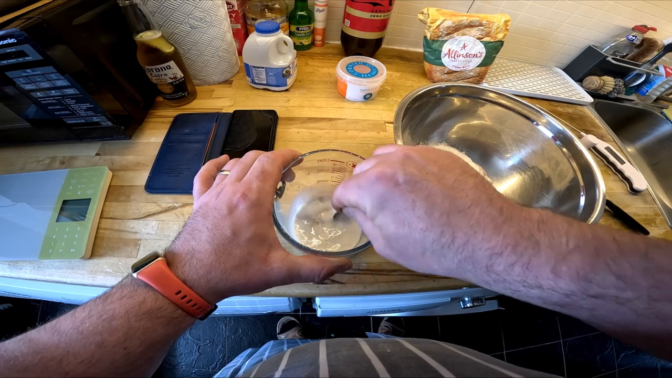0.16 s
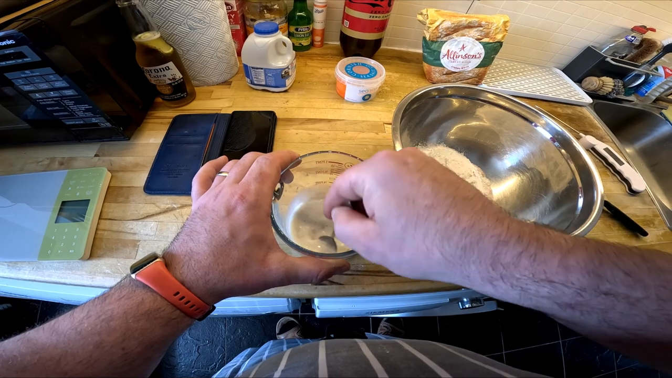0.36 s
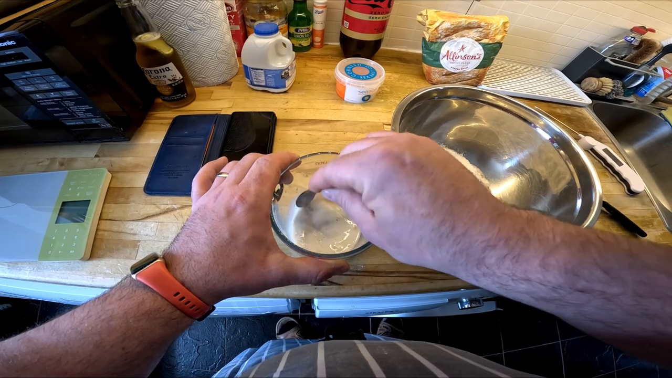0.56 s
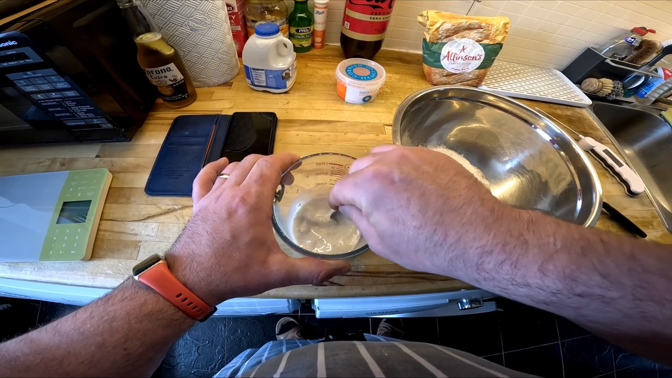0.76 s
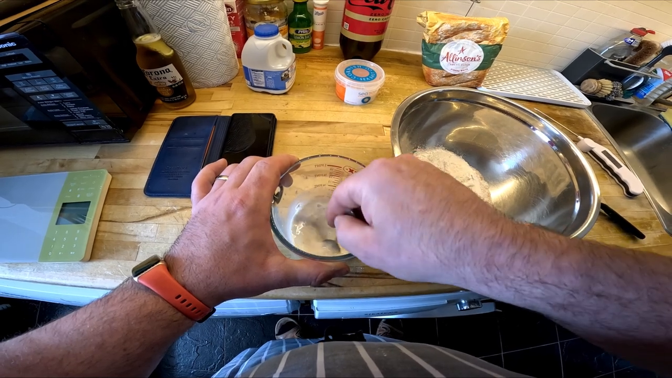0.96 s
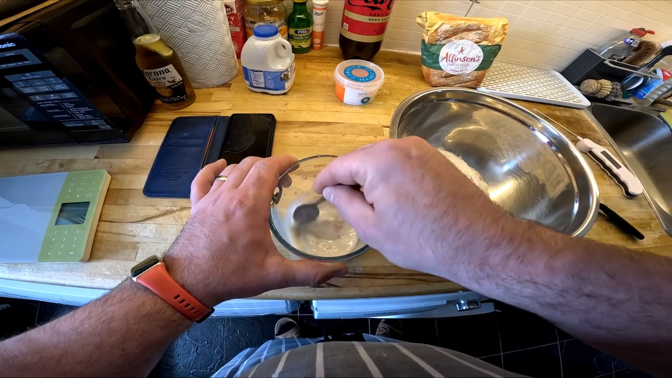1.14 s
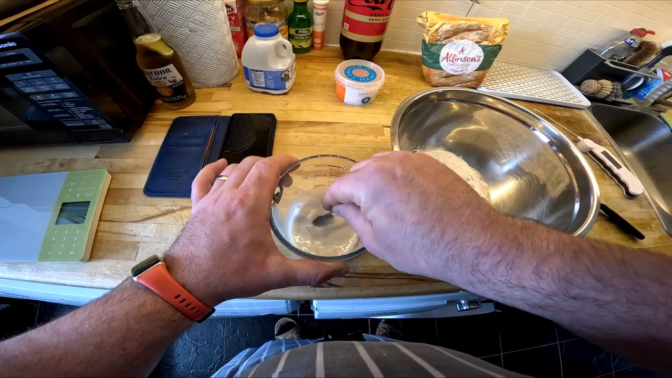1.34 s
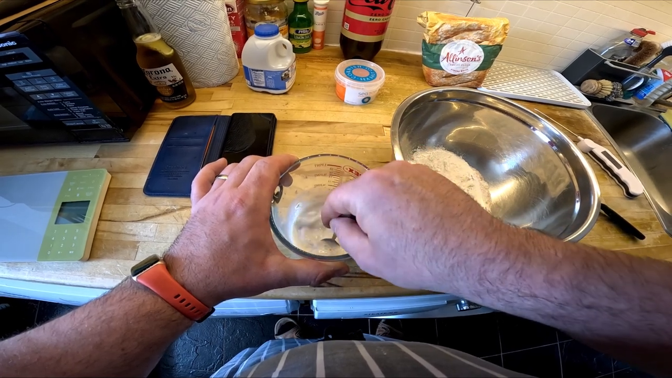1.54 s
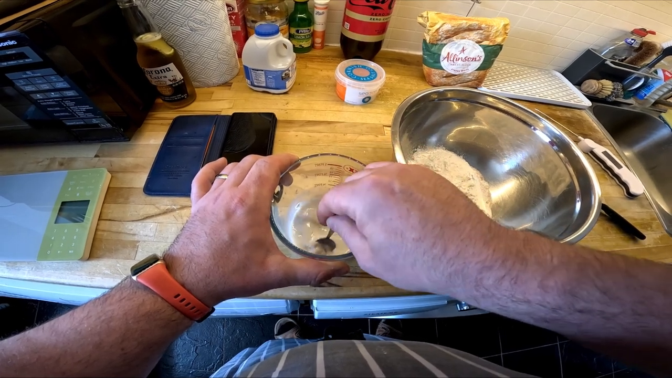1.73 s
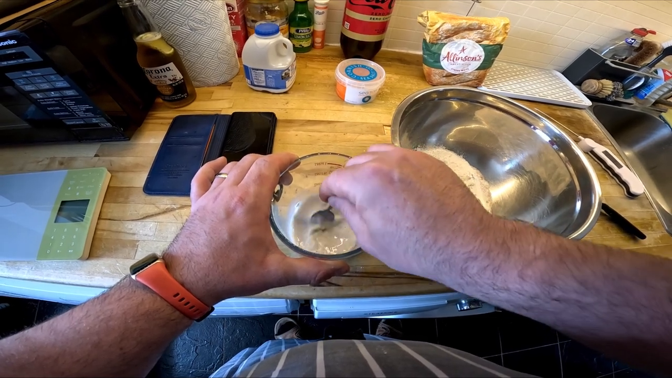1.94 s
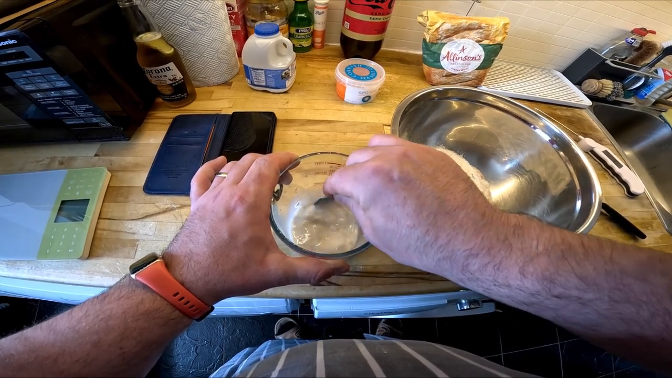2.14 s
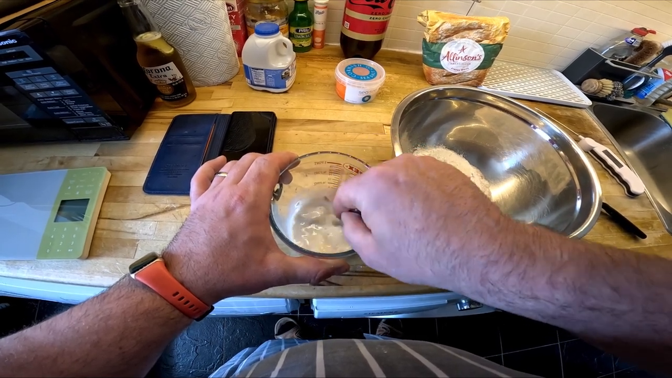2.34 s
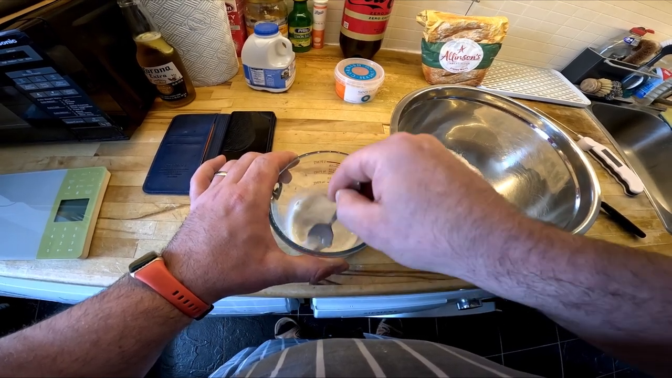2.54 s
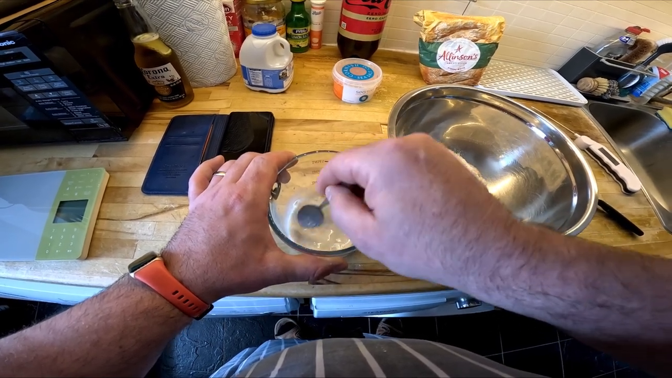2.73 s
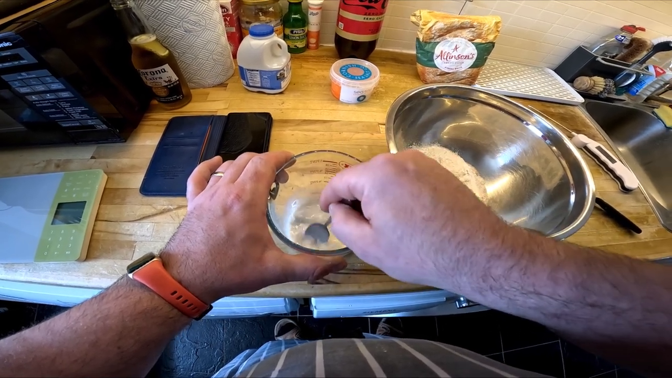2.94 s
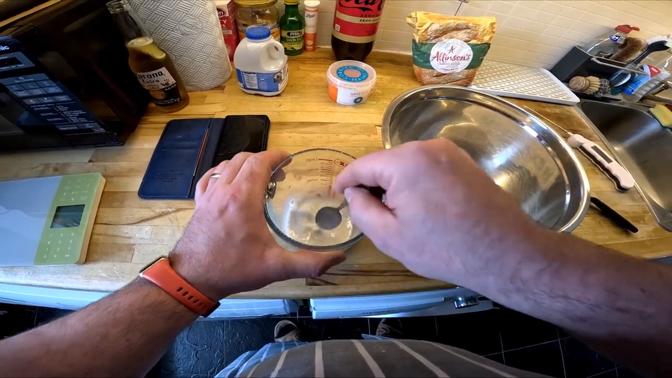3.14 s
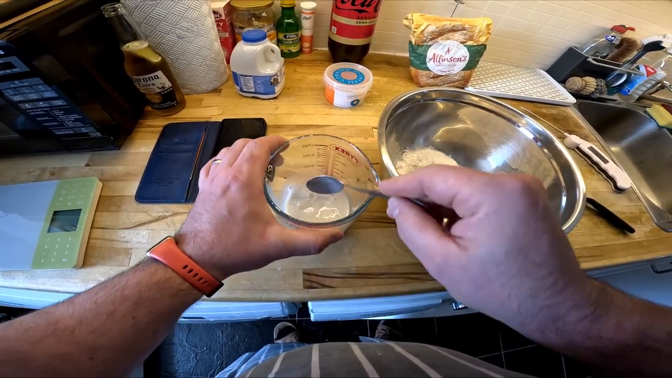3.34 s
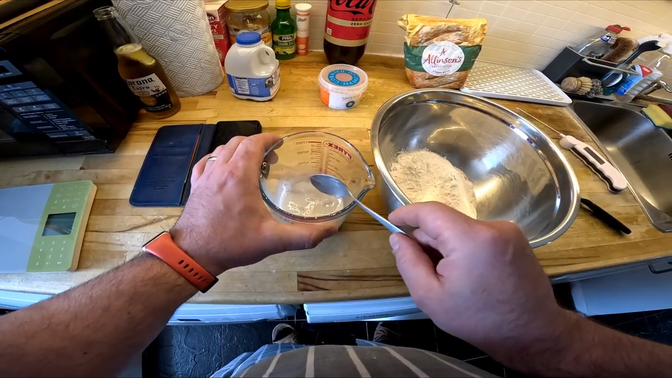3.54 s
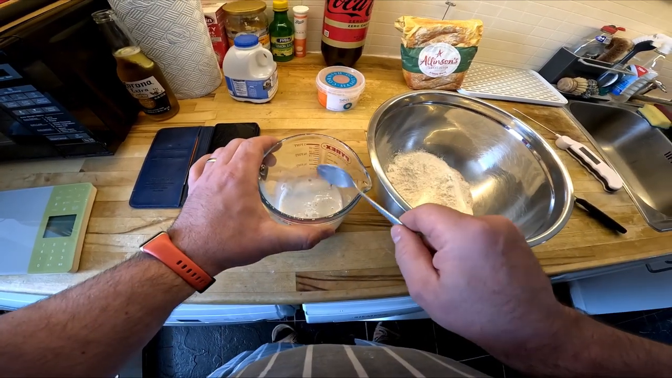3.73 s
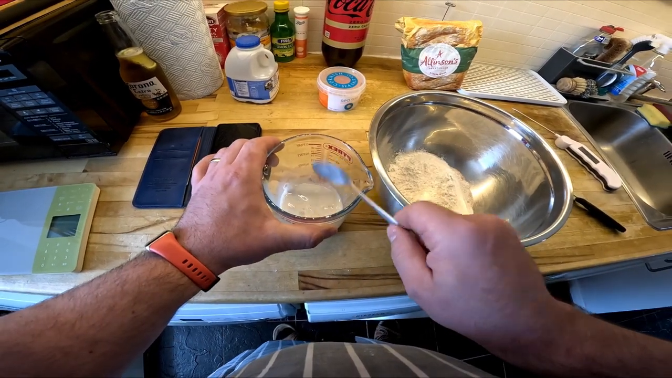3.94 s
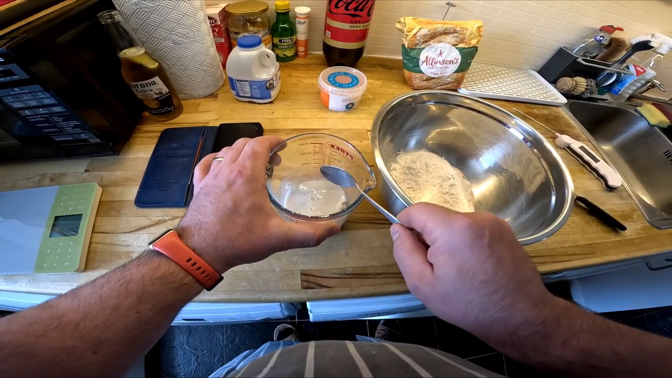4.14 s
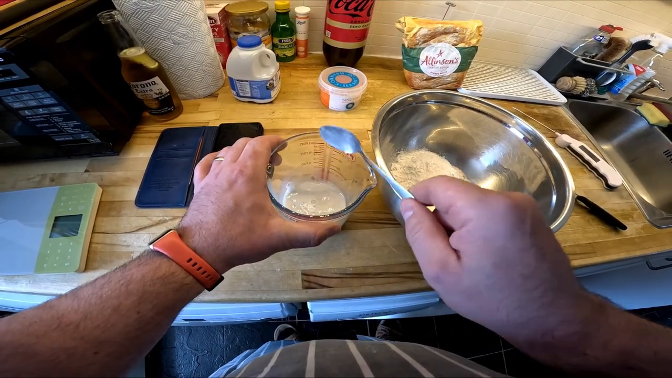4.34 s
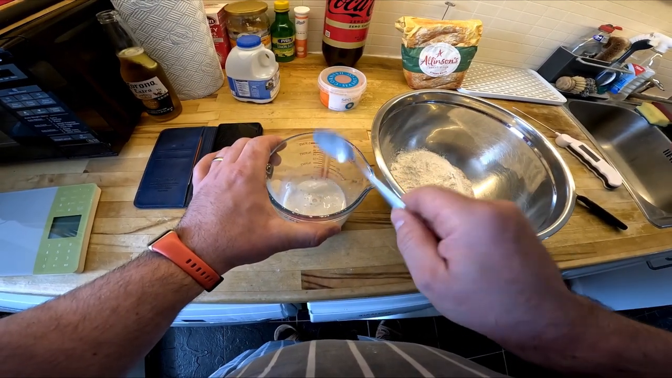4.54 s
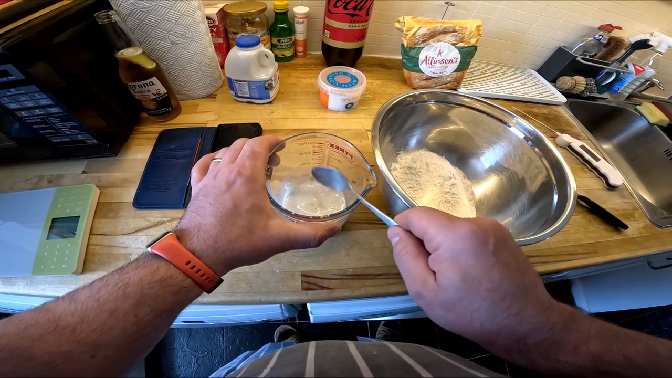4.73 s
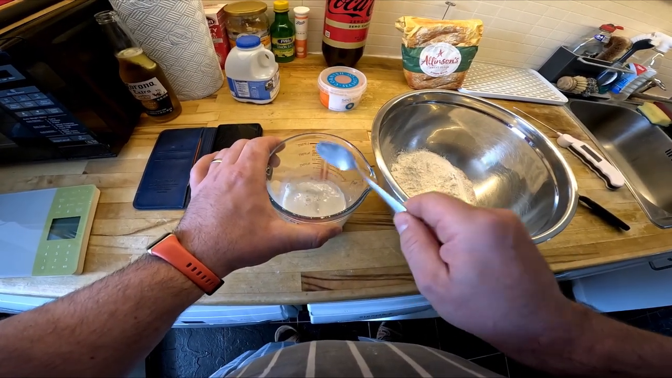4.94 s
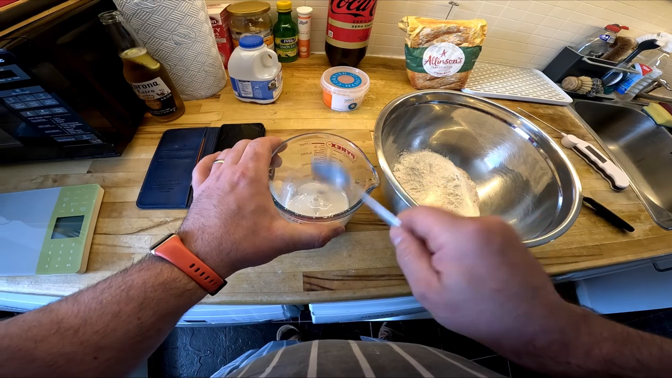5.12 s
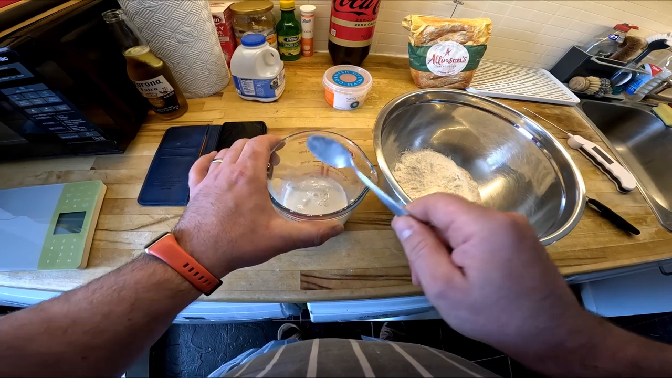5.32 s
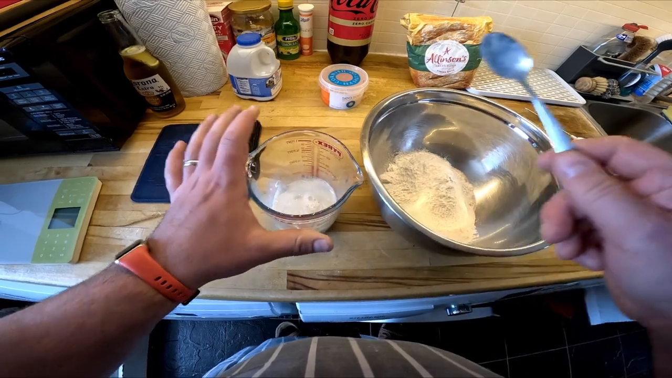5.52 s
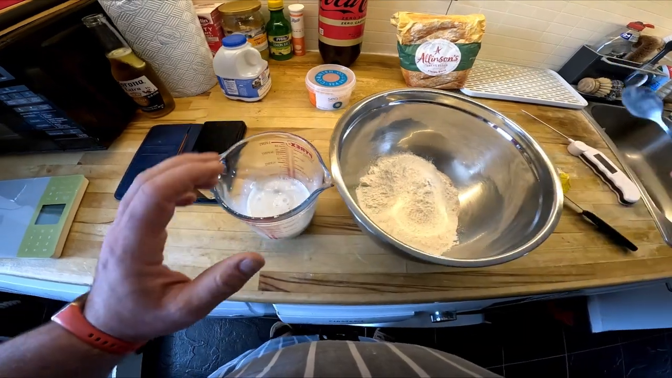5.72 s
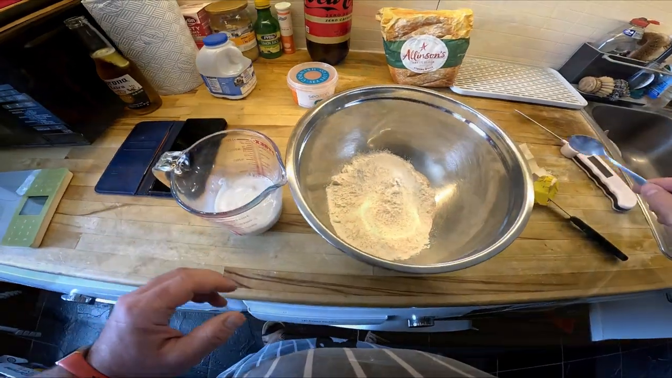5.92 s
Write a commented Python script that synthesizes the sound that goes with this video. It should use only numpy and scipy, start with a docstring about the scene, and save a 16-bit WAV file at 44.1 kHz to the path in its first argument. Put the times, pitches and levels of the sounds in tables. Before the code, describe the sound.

Close, arm's-length stereo pickup in a small domestic kitchen. A spoon knocks unevenly against the inside of a glass jug while stirring, some clinks dull and faint, others sharper, with tiny grazes and a low rumble swelling with each stroke. After a short pause come six crisp spoon taps on the glass rim, the last bouncing once, with woody thuds beneath. Then only quiet room air and a faint appliance hum remain.

```python
"""A low rumble of room air and a faint hum run throughout, as filtered noise and wavering sine tones.
First a metal spoon stirs a little liquid in a hand-held glass jug: strokes swell a low shudder and rumble,
while clinks and grazes ring damped glass modes. The spoon is lifted out and the jug shifts on the worktop.
Then six clean taps on the rim, the last with a rebound, ring spoon and glass and thump the wooden worktop.
A small kitchen answers each blow with a bounce and a diffuse tail, heard from an arm's length."""
import sys
import numpy as np
from scipy import signal
from scipy.fft import rfft, irfft
from scipy.io import wavfile

SR = 44100
rng = np.random.default_rng(int(sys.argv[2]) if len(sys.argv) > 2 else 0)


def wav_record(signal):
    """Record a signal, one row per channel, as 16-bit PCM in the file named by sys.argv[1]."""
    frames = np.transpose(np.atleast_2d(signal))
    bounded = np.clip(frames, -1, 1)
    # unit amplitude maps onto the largest positive 16-bit level
    quanta = np.round(bounded * 32767).astype(np.int16)
    wavfile.write(sys.argv[1], SR, quanta)


N = 267687
TIME = np.arange(N) / SR
RING_TIME = TIME[:SR // 2]
LEFT_RIGHT = np.array([[1], [-1]])  # side signal: opposite sign in the two channels

# colour of the room air: f/Hz, relative level/dB
AIR_SPECTRUM = [(25, -0.5), (45, -3.5), (65, -15), (160, -14), (300, -23.5), (700, -33), (1300, -30.5),
                (2500, -42.5), (4500, -47), (7000, -44.5), (10000, -55.5), (13000, -59), (16000, -81.5)]
# hum of an appliance, mean strength: f/Hz, level/dB
HUM_TONES = [(149, -66.5), (199, -72.5)]
# kitchen reverberation before the wet level: f/Hz, relative level/dB, t60/s
ROOM_BANDS = [(80, -9, 0.39), (322, 13, 0.28), (890, 5.5, 0.28), (2840, -1, 0.38), (6840, -10, 0.39),
              (9900, -2, 0.4), (15100, -9.5, 0.41)]
# colour of the stirring rumble: f/Hz, relative level/dB
STIR_COLOUR = [(20, -9), (45, 1), (70, -11.5), (100, -16), (200, -33.5), (500, -36.5), (1500, -49.5),
               (6000, -61), (15000, -89)]
# worktop under the jug, before small random shifts: f/Hz, relative level/dB, t60/s
BOARD_MODES = [(49, -7, 0.083), (76, -12, 0.219), (96, -2, 0.16), (153, 0, 0.09), (184, -2, 0.18),
               (215, -3, 0.045), (255, -6, 0.081), (334, -9, 0.22), (363, -17, 0.4), (416, -12, 0.061),
               (468, -22, 0.364), (518, -13, 0.09), (586, -23, 0.6), (654, -20, 0.166), (698, -13, 0.112),
               (794, -8, 0.067)]
# jug wall and spoon bowl, damped by the liquid, before random shifts: f/Hz, relative level/dB, t60/s
GLASS_MODES = [(785, -3, .04), (1080, -2, .02), (1330, -3, .025), (1800, -9, .012), (2300, -3, .014),
               (2740, 0, .014), (3100, -4, .012), (3740, -1, .01), (4250, -3, .008), (4750, -1, .012),
               (5550, -2, .009), (6150, -1, .01), (6800, -6, .008), (7300, -12, .03), (8100, -8, .008),
               (11500, -14, .006)]
# spoon and rim ringing in the air, before small random shifts: f/Hz, relative level/dB, t60/s
RIM_RESONANCES = [(756, -12, 0.012), (958, -30, 0.036), (1260, -26, 0.018), (1698, -40, 0.3),
                  (1766, -30, 0.029), (2311, -29, 0.027), (3005, -28, 0.071), (3351, -15, 0.063),
                  (3412, -14, 0.038), (3666, -15, 0.011), (4164, -18, 0.04), (4585, -16, 0.022),
                  (4780, -20, 0.02), (5183, -28, 0.031), (5819, -16, 0.055), (6015, -10, 0.019),
                  (6349, 0, 0.008), (6683, 0, 0.012), (7087, -11, 0.02), (7377, -9, 0.018),
                  (7638, -9, 0.007), (9609, -25, 0.02), (9970, -16, 0.007), (10446, -15, 0.007),
                  (11109, -22, 0.012), (11904, -22, 0.004), (13094, -29, 0.004)]
# light grazes of the spoon, dry: t/s, level/dB, decay time of the slips/s
GRAZE_EVENTS = [(0.137, -66, 0.0034), (0.209, -45, 0.0028), (0.369, -59.5, 0.02), (0.945, -60, 0.0044),
                (1.119, -58, 0.003), (1.975, -59.5, 0.025), (3.734, -56.5, 0.013), (4.27, -61.5, 0.0029)]
# spoon against the wall while stirring, dry: t/s, favoured f/Hz, level/dB, brightness/(dB per octave)
KNOCK_EVENTS = [(0.1153, 1130, -53.5, 1.3), (0.1876, 3800, -35, 1.2), (0.1998, 4750, -32, 1),
                (0.291, 1750, -52, -2.1), (0.402, 4490, -43.5, 0.1), (0.4274, 2310, -52, -1.5),
                (0.7609, 1360, -43, 2), (0.8372, 1080, -24.5, -.3), (0.9, 3740, -36.5, 1),
                (1.0187, 3470, -44, -2.5), (1.0859, 7300, -40, 4.5), (1.4553, 5550, -26, .8),
                (1.6188, 1090, -59.5, -7), (1.8952, 1330, -39, -7.5), (2.312, 3700, -37.5, 1),
                (2.3612, 3680, -38.5, 0.3), (2.5134, 1315, -38.5, -2.5), (2.5407, 7300, -38.5, 3.5),
                (2.9512, 5100, -25, 5)]
# register borders of a knock: f/Hz
KNOCK_BORDERS = [600, 2000, 5000, 9000, 14000]
# balance of a knock's registers from low to top: relative level/dB
KNOCK_BALANCE = [-4, 0, -7, -28]
# spoon on the rim, the last one a rebound, dry:
# t/s, favoured f/Hz, level/dB, brightness/(dB per octave), worktop level/dB
TAP_EVENTS = [(3.5233, 5870, -15, -1.5, -28.5), (4.0907, 6750, -16, 1.6, -30),
              (4.7268, 6570, -22.5, 0.95, -42), (4.8074, 6700, -20, 0.5, -35.5),
              (4.9196, 6560, -21, -0.25, -36), (5.268, 6980, -16.5, .5, -25.5),
              (5.292, 5960, -26, -3.5, -35)]
# register borders of a tap: f/Hz
TAP_BORDERS = [600, 2500, 5200, 8500, 14000]
# balance of a tap's registers from low to top: relative level/dB
TAP_BALANCE = [-17, -5.5, -0.5, -14]

AIR_DB = -57
# the stirring arm shakes the worktop with every stroke, until the spoon is lifted out
STROKES_PER_S, STIR_END_S, STIR_RELEASE_S = 5.0, 3.1, 0.11
SHUDDER_HZ, SHUDDER_DRIFT_HZ, SHUDDER_DB = 46.2, 1.7, -50  # level at the height of a stroke
RUMBLE_DB, RUMBLE_SIDE_DB = -57.5, -7.5  # at the height of a stroke; side relative to middle
RUMBLE_SWELL = .5  # share of the rumble that follows the strokes
PIVOT_HZ = 3000  # brightness tilts the registers about this point
CHATTER_DB, CHATTER_S = -12, .012  # the spoon skids on after a knock: level under the blow, decay time
# a firm, dull knock moves the jug most: dB for a 0 dB knock, dB per dB of level, dB lost per dB/octave
THUD_DB, THUD_GROWTH, THUD_LOSS = -26, 0.84, 1.1
KNOCK_WORKTOP_DB = -1  # thump of the worktop relative to the thud of the jug
WORKTOP_UPPER_DB, WORKTOP_HARDNESS = -9, 2.2  # upper board register; its gain in dB per dB/octave
BUMP_S, BUMP_DB = 3.488, -38.5  # the jug shifts on the worktop just before the first tap
TOP_HZ = 15800


def undb(db):
    """Decibels to gain."""
    return 10 ** (np.asarray(db) / 20)


def rms(x):
    """Root mean square."""
    return np.sqrt(np.mean(x ** 2))


def band(x, lo, hi, order=3):
    """Causal band-pass."""
    sos = signal.butter(order, [lo, min(hi, .45 * SR)], "band", fs=SR, output="sos")
    return signal.sosfilt(sos, x)


def add(track, s, sound):
    """Mix a sound into a track at time s."""
    start = int(s * SR)
    track[start:start + len(sound)] += sound[:N - start]


def noise(spectrum):
    """Noise of unit RMS, coloured by (Hz, dB) points joined along log frequency."""
    hz, db = np.transpose(spectrum)
    f = np.fft.rfftfreq(N, 1 / SR) + 1  # the 1 Hz offset avoids log(0)
    colour = undb(np.interp(np.log(f), np.log(hz), db))
    x = irfft(rfft(rng.standard_normal(N)) * colour, N)
    return x / rms(x)


def wide_noise(spectrum, side_db):
    """Stereo noise: a shared middle and a weaker, independent side."""
    return noise(spectrum) + undb(side_db) * noise(spectrum) * LEFT_RIGHT


def decay(t60):
    """Exponential fade that loses 60 dB in t60 seconds."""
    return np.exp(-np.log(1000) * RING_TIME / t60)


def swell(rise_s):
    """The gradual start of a blow."""
    return 1 - np.exp(-RING_TIME / rise_s)


def ring(modes, scatter_db, detune, favoured_hz=1, favour_db=0, reach=0.023):
    """Decaying modes; contact favours one region, and level, pitch and phase vary from mode to mode."""
    hz, db, t60 = np.transpose(modes)
    size, shift, phase = rng.standard_normal((3, len(hz), 1))
    db = db + favour_db * np.exp(-(np.log(hz / favoured_hz) / reach) ** 2)
    strength = undb(db[:, None] + scatter_db * size)
    shifted_hz = hz[:, None] * (1 + detune * shift)
    waves = np.sin(2 * np.pi * (shifted_hz * RING_TIME + phase))
    return np.sum(strength * waves * decay(t60[:, None]), axis=0)


def crack(t60):
    """The burst of dense, short vibrations at a contact."""
    return rng.standard_normal(len(RING_TIME)) * decay(t60)


def skid(length):
    """A dying cluster of tiny slips, with unit energy."""
    slips = rng.standard_normal(len(RING_TIME)) ** 3 * np.exp(-RING_TIME / length)
    return slips / np.linalg.norm(slips)


def skid_over(sound, length):
    """Every tiny slip of a skid sets off the sound again."""
    return signal.fftconvolve(skid(length), sound)[:len(RING_TIME)]


def registers(edges, balance, db, brightness):
    """Levels of a blow's registers: the harder the contact, the more they tilt towards the treble."""
    centres = np.sqrt(np.multiply(edges[:-1], edges[1:]))
    return db + np.array(balance) + brightness * np.log2(centres / PIVOT_HZ)


def voice(blow, edges, levels, span=.012):
    """Give each register of a blow its RMS strength over the first `span` seconds."""
    out = np.zeros(len(blow))
    for lo, hi, db in zip(edges, edges[1:], levels):
        part = band(blow, lo, hi, order=4)
        out += undb(db) * part / rms(part[:int(span * SR)])
    return out


def background():
    """Soft room air, nearly the same on both sides, and the slowly wavering hum of an appliance."""
    air = wide_noise(AIR_SPECTRUM, side_db=-7)
    waver = 1 + 0.37 * noise([(1, 3.5), (5, -9.0), (20, -62), (100, -120)])
    hum = sum(undb(db) * np.sqrt(2) * np.sin(2 * np.pi * hz * TIME) for hz, db in HUM_TONES)
    return undb(AIR_DB) * air + waver * hum


def kitchen(x, wet_db, pan_db):
    """Direct sound with a bounce off the worktop, and the diffuse room: noise that decays band by band."""
    hz, db, t60 = np.transpose(ROOM_BANDS)
    edges = np.geomspace(50, 16000, 13)
    tail = np.zeros((2, len(RING_TIME)))
    for lo, hi in zip(edges, edges[1:]):
        log_centre = np.log(lo * hi) / 2
        mid, side = band(rng.standard_normal((2, len(RING_TIME))), lo, hi)
        width = min(hi / 2200, .7)  # long waves reach both channels alike
        fade = decay(np.interp(log_centre, np.log(hz), t60))
        level = undb(np.interp(log_centre, np.log(hz), db))
        tail += level * fade * (mid + width * side * LEFT_RIGHT)
    tail *= swell(rise_s=.005) * undb(wet_db) / np.sqrt(SR / 30)
    near = x + .25 * np.interp(TIME - .0023, TIME, x)  # the late copy is the bounce
    lag = np.exp(-2j * np.pi * np.fft.rfftfreq(N, 1 / SR) * 1.5e-5)  # the left hears it a moment later
    left = undb(pan_db / 2) * irfft(rfft(near) * lag, N)
    right = undb(-pan_db / 2) * near
    return np.array([left, right]) + signal.fftconvolve(x[None], tail, axes=1)[:, :N]


def stirring():
    """The jug rocks under the moving hand: a low shudder and a rumble swell with each stroke, then die away."""
    stroke = np.abs(np.sin(np.pi * STROKES_PER_S * TIME))
    effort = np.exp(-np.maximum(TIME - STIR_END_S, 0) / STIR_RELEASE_S)
    hz = SHUDDER_HZ + SHUDDER_DRIFT_HZ * noise([(5, 0), (20, -40), (100, -120)])
    shudder = undb(SHUDDER_DB) * np.sqrt(2) * np.sin(2 * np.pi * np.cumsum(hz) / SR)
    rumble = undb(RUMBLE_DB) * wide_noise(STIR_COLOUR, RUMBLE_SIDE_DB)
    rumble_swell = 1 + RUMBLE_SWELL * (stroke - 1)
    return effort * (stroke * shudder + rumble_swell * rumble)


def thump(db, brightness=0):
    """A push on the jug sets the wooden worktop ringing; the heavy board takes a moment to move."""
    board = ring(BOARD_MODES, scatter_db=1, detune=.003)
    dense = undb(2.5) * band(crack(t60=0.24), 110, 900, order=2)
    wood = (board + dense) * swell(rise_s=0.0071)
    upper_db = db + WORKTOP_UPPER_DB + WORKTOP_HARDNESS * brightness
    return voice(wood, [40, 280, 1200], [db, upper_db], span=.05)


def grazes():
    """The spoon's edge skids over the glass: a cluster of tiny slips rings the wall."""
    out = np.zeros(N)
    for s, db, length in GRAZE_EVENTS:
        wall = ring(GLASS_MODES, scatter_db=4.5, detune=0.05) + undb(3.5) * crack(t60=0.0029)
        add(out, s, voice(skid_over(wall, length), [1800, 12000], [db]))
    return out


def knocks():
    """Dull, short clinks of the spoon under the liquid, each with a skid and a small thud of jug and worktop."""
    clinks, thumps = np.zeros((2, N))
    for s, hz, db, brightness in KNOCK_EVENTS:
        # the depth of the spoon and the grip change the pitch from knock to knock
        wall = ring(GLASS_MODES, scatter_db=2, detune=.03, favoured_hz=hz, favour_db=7)
        dense = undb(4) * band(crack(t60=.016), 500, 8000, order=1)
        blow = (wall + dense) * swell(rise_s=.0003)
        blow = blow + undb(CHATTER_DB) * skid_over(blow, CHATTER_S)
        levels = registers(KNOCK_BORDERS, KNOCK_BALANCE, db, brightness)
        add(clinks, s, voice(blow, KNOCK_BORDERS, levels))
        thud_db = THUD_DB + THUD_GROWTH * db - THUD_LOSS * brightness
        thud = band(crack(t60=0.12), 300, 750, order=2) * swell(rise_s=0.0027)
        add(clinks, s, voice(thud, [130, 1000], [thud_db], span=0.035))
        add(thumps, s, thump(thud_db + KNOCK_WORKTOP_DB))
    return clinks, thumps


def taps():
    """Bright clinks ring rim and spoon; each blow, and the jug's shift before, thumps the worktop."""
    clinks, thumps = np.zeros((2, N))
    add(thumps, BUMP_S, thump(BUMP_DB))
    for s, hz, db, brightness, thump_db in TAP_EVENTS:
        rim = ring(RIM_RESONANCES, scatter_db=1.5, detune=.001, favoured_hz=hz, favour_db=8, reach=.04)
        blow = (rim + undb(-16) * crack(t60=.012)) * swell(rise_s=.0005)
        levels = registers(TAP_BORDERS, TAP_BALANCE, db, brightness)
        add(clinks, s, voice(blow, TAP_BORDERS, levels))
        add(thumps, s, thump(thump_db, brightness))
    return clinks, thumps


def scene():
    """Blows inside the jug, on the rim and in the worktop each excite the kitchen, over stirring and room."""
    wall_clinks, wall_thumps = knocks()
    rim_clinks, rim_thumps = taps()
    inside = kitchen(wall_clinks + grazes(), wet_db=-8.5, pan_db=1.5)
    rim = kitchen(rim_clinks, wet_db=-5, pan_db=2.5)
    worktop = kitchen(wall_thumps + rim_thumps, wet_db=-9.5, pan_db=0.85)
    return background() + stirring() + worktop + inside + rim


def record(dry):
    """Clip the peaks at full scale, then cut the top steeply."""
    low_pass = signal.ellip(8, .2, 70, TOP_HZ, fs=SR, output="sos")
    return signal.sosfilt(low_pass, np.clip(dry, -1, 1))


dry = scene()
out = record(dry)
wav_record(out)
```